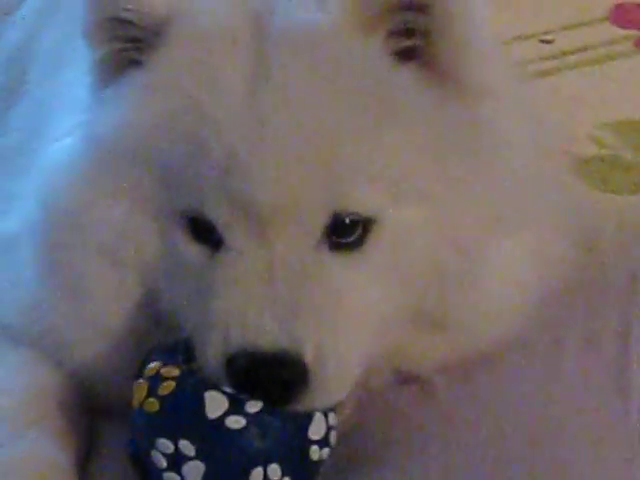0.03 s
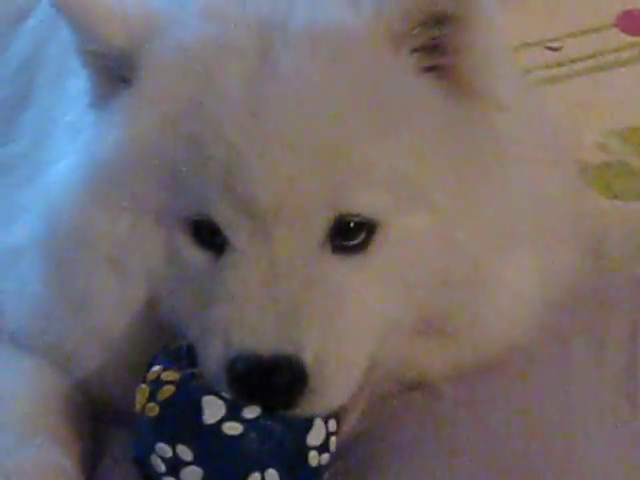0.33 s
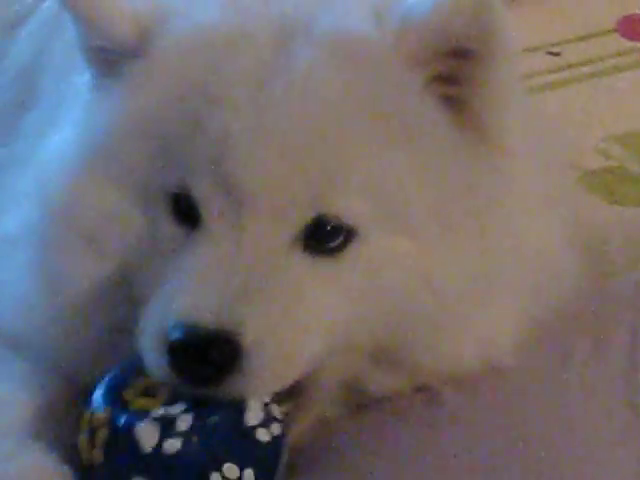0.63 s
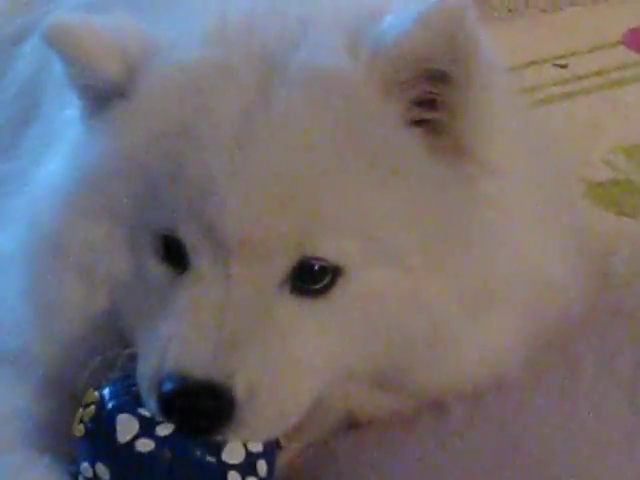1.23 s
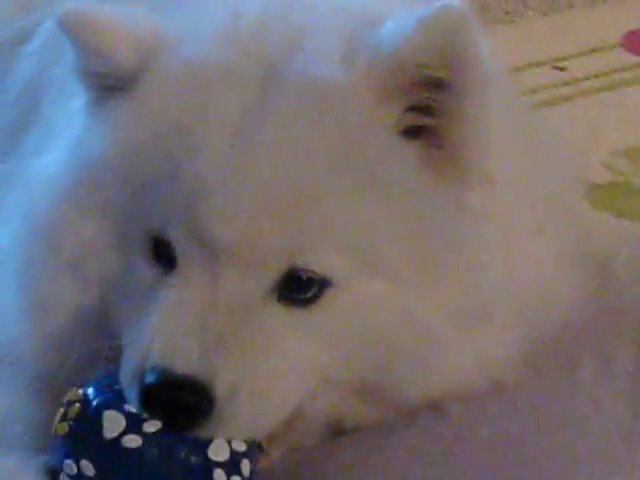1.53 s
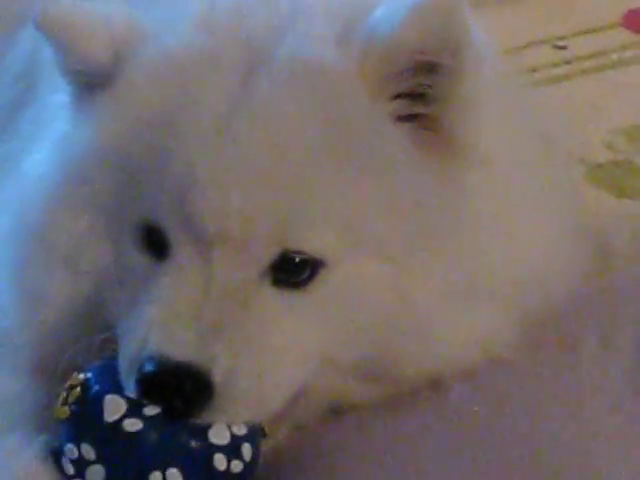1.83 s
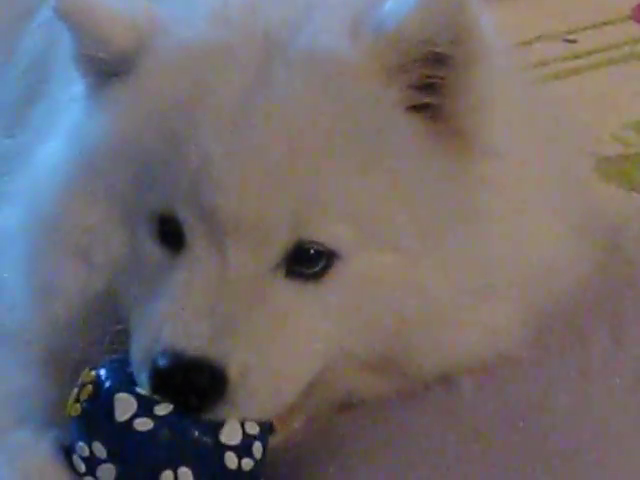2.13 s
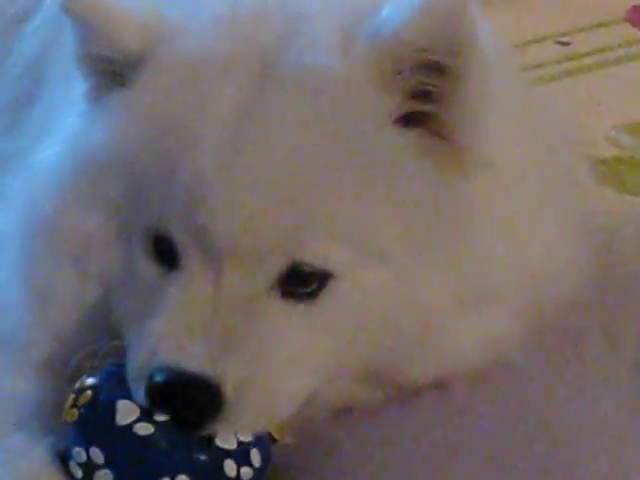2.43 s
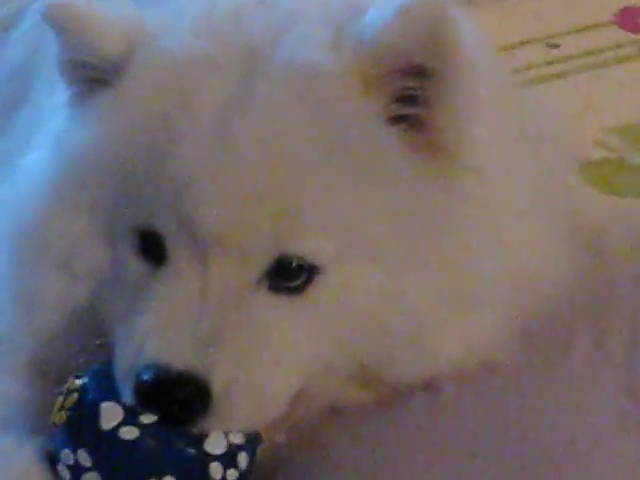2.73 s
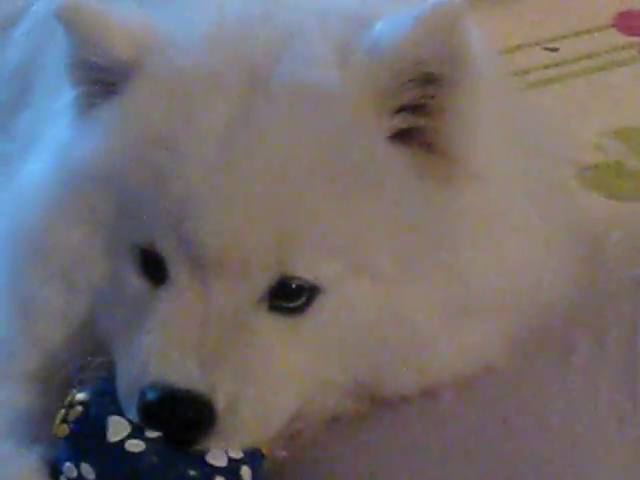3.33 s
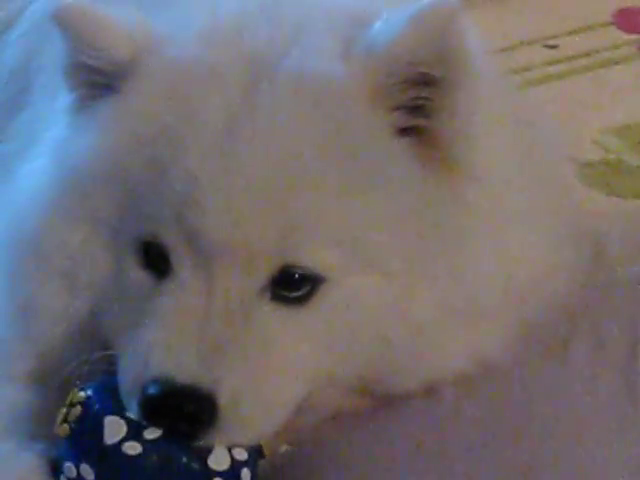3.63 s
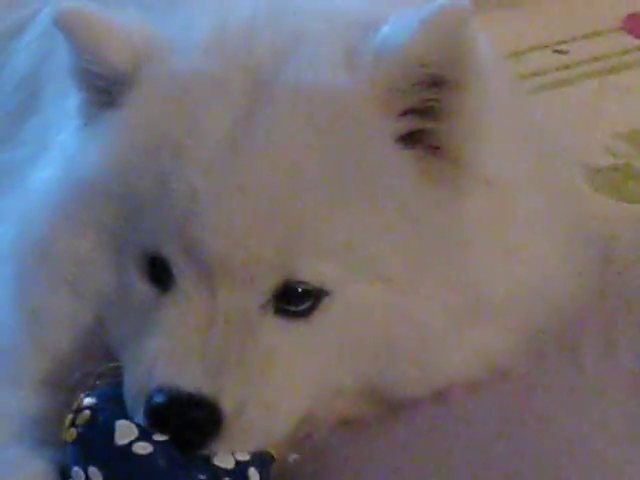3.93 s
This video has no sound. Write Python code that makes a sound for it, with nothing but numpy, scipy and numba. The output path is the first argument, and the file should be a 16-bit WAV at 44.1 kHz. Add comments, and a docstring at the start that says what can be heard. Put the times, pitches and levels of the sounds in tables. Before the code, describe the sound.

Close to the microphone in a quiet room, a squeaky toy is chewed by a dog in a steady rhythm. Six short, shrill squeaks alternate with five drawn-out, reedy tones that sag and sputter as the ball refills.

```python
"""A dog chews a rubber squeaker ball in a quiet room, close to a camera.
First a bite pushes air through the ball's reed: a loud squeak that rises and falls, with a soft, low
thump from the overloaded camera at its start. The gain control lets an instant through, then clamps.
Next the jaw eases and the ball sucks air back in: a long, lower tone that ends in flutter and hiss.
Near the end of that first refill the dog shifts its grip. Five more bites follow, with refills between."""
import sys
import numpy as np
from scipy import signal
from scipy.fft import rfft, irfft
from scipy.io import wavfile
from scipy.ndimage import uniform_filter1d
from numba import njit

SR = 44100
rng = np.random.default_rng(int(sys.argv[2]) if len(sys.argv) > 2 else 0)


def unload_audio(sound):
    """Save the sound as a 16-bit wav file, at the path given as the first command line argument."""
    columns = np.transpose(np.atleast_2d(sound))
    # keep every value between -1 and 1, then stretch to whole-number steps
    steps = np.round(np.clip(columns, -1, 1) * 32767)
    wavfile.write(sys.argv[1], SR, steps.astype(np.int16))


N = 176400
T = np.arange(N) / SR

# the tune of the squeak, one list per bite: (time [s], pitch [Hz])
BITE_PITCHES = [
    [(0.0, 1220), (0.032, 1361), (0.048, 1363), (0.066, 1623), (0.12, 1734), (0.13, 1832), (0.146, 1838),
     (0.16, 1745), (0.168, 1662), (0.18, 1266), (0.19, 1107)],
    [(0.856, 1139), (0.926, 1346), (0.936, 1454), (0.946, 1610), (0.98, 1843), (1.016, 1758), (1.04, 1789),
     (1.054, 1698), (1.06, 1660), (1.068, 1366), (1.085, 1105)],
    [(1.543, 1167), (1.603, 1395), (1.615, 1670), (1.633, 1740), (1.639, 1945), (1.643, 1906),
     (1.661, 1980), (1.683, 2050), (1.703, 2034), (1.721, 1880), (1.731, 1702), (1.735, 1646),
     (1.747, 1244), (1.75, 1167)],
    [(2.296, 1141), (2.322, 1210), (2.358, 1300), (2.382, 1350), (2.392, 1438), (2.404, 1612),
     (2.434, 1631), (2.454, 1679), (2.476, 1672), (2.49, 1602), (2.5, 1390), (2.516, 1242), (2.53, 1050)],
    [(3.16, 1158), (3.2, 1294), (3.241, 1380), (3.255, 1644), (3.273, 1674), (3.301, 1719), (3.316, 1690),
     (3.33, 1606), (3.34, 1362), (3.35, 1285), (3.365, 1080)],
    [(3.798, 1170), (3.816, 1243), (3.876, 1389), (3.886, 1606), (3.896, 1667), (3.912, 1660),
     (3.926, 1577), (3.928, 1569), (3.938, 1368), (3.96, 1283), (3.985, 1020)],
]
# one row per bite: (start [s], stop [s], strength [dB], pitch where the reed's period doubles [Hz])
BITE_EVENTS = [(-.02, 0.209, -5.5, 1730), (0.8558, 1.099, -6, 1720), (1.543, 1.772, -5, 1815),
               (2.2955, 2.539, -7, 1780), (3.1608, 3.378, -6, 1660), (3.798, 3.994, -5.5, 1780)]
# strength of the partials (the pure tones in a sound), blowing out: (frequency [Hz], relative level [dB])
BITE_COLOUR = [(1150, -22.5), (1700, -19.5), (2600, -15), (3400, -9.5), (4000, -9.5), (4900, -6),
               (5400, -0.5), (5950, 3), (6600, -2.5), (7300, -14), (8600, -24.5), (10000, -18.5),
               (11500, -23), (12400, -29), (13400, -23.5), (14700, -18.5), (15600, -20), (16000, -40)]
# on high notes the reed repeats only every second swing, which adds in-between partials:
# (pitch above the doubling point [Hz], relative level of those partials [dB])
DOUBLING = [(-150, -57), (-44, -34), (10, -13), (72, -10), (180, 1)]
# air rushing through the reed: (frequency [Hz], relative level [dB])
RUSH_COLOUR = [(60, -17), (300, -24), (900, -7), (2000, -11), (3500, -5), (6000, -5.5), (7200, 1.5),
               (9000, -7), (15500, -21)]
# the room's steady background noise: (frequency [Hz], relative level [dB])
BACKGROUND_COLOUR = [(25, -5.5), (70, 0), (150, -3), (240, -0.5), (400, -5), (800, -8), (2000, -23),
                     (15000, -12.5)]
# echoes from the floor and nearby furniture: (delay [s], level before dulling [dB])
ECHOES = [(.00855, -10.5), (.0133, -14.5), (.0181, -17), (.02, -16)]
# how long the room rings: (frequency [Hz], time to fade by 60 dB [s])
ROOM_FADE = [(500, .5), (3000, .48), (6000, .38), (9000, .24), (16000, .17)]
# how strongly the room rings: (frequency [Hz], level [dB])
ROOM_COLOUR = [(500, -6), (3000, -7.5), (6000, -6.5), (9000, -5), (16000, -7)]
# the tone of air going back in, one list per refill: (time [s], pitch [Hz], relative level [dB])
REFILL_CURVES = [
    [(.215, 988, -33), (.24, 1036, -29), (.275, 1056, -23), (.31, 1057, -23), (.425, 1047, -24.4),
     (.57, 1050, -21.6), (.623, 1045, -24.5), (.66, 1030, -25.5), (.69, 985, -27), (.715, 935, -27.5),
     (.745, 900, -30), (.78, 880, -37), (.81, 880, -42)],
    [(1.11, 995, -34), (1.147, 1041, -28.5), (1.18, 1049, -21.5), (1.257, 1043, -19.5), (1.29, 1035, -22.5),
     (1.41, 1029, -27), (1.45, 1016, -27.5), (1.468, 960, -29), (1.5, 915, -34), (1.53, 915, -38)],
    [(1.765, 1011, -31), (1.8, 1064, -27), (1.83, 1075, -23), (1.874, 1064, -21.4), (1.934, 1041, -26),
     (2.007, 1014, -24), (2.104, 971, -24.5), (2.148, 962, -24.7), (2.2, 962, -23), (2.235, 950, -26),
     (2.248, 915, -31), (2.265, 910, -36)],
    [(2.54, 1002, -31.5), (2.575, 1056, -23.5), (2.61, 1073, -20), (2.673, 1064, -14), (2.746, 1037, -20),
     (2.819, 1013, -14.5), (2.912, 965.5, -20.5), (2.996, 937.5, -18.5), (3.057, 932.3, -22),
     (3.108, 945, -21.5), (3.12, 928, -29), (3.136, 833, -31)],
    [(3.385, 992, -29), (3.41, 1036, -24), (3.43, 1061, -24.5), (3.465, 1062, -14.5), (3.515, 1052, -16),
     (3.551, 1038, -19.5), (3.596, 1017, -16.5), (3.69, 979.5, -18.5), (3.73, 967, -21.5),
     (3.752, 938, -24), (3.775, 872, -32)],
]
# one row per refill: (flutter starts [s], reed stops [s], ball is full [s], strength [dB], last hiss [dB])
REFILL_EVENTS = [(0.668, 0.795, 0.865, 4.5, -41), (1.418, 1.53, 1.555, 3, -35),
                 (2.21, 2.285, 2.305, 3.5, -34), (3.098, 3.145, 3.17, -0.5, -34),
                 (3.725, 3.785, 3.81, 1, -34)]
# strength of the partials, sucking in: (frequency [Hz], relative level [dB])
REFILL_COLOUR = [(930, -5.5), (1060, -5.5), (1880, -4), (2130, -4), (2830, -4), (3170, 2.5), (3750, -3),
                 (4080, -0.5), (4220, 2.5), (4700, -1), (5200, 0), (5350, 1.5), (5780, 4.5), (6000, -4),
                 (6200, -19), (6430, 5.5), (6650, 4), (7000, -7.5), (7400, -7), (8300, -7.5), (8750, -5.5),
                 (9100, -7.5), (9450, -4.5), (10000, -3.5), (10450, -20), (11000, -12), (11700, -5.5),
                 (12600, -6.5), (13600, -1.5), (14450, -2.5), (15000, -11), (15400, -11), (15700, -5.5)]
# faint steady hiss under the refill tone: (frequency [Hz], relative level [dB])
REFILL_HISS_COLOUR = [(300, -18), (1000, 3), (5000, 2), (10000, -8), (15000, -39)]
# the dog shifts its grip: (start [s], length [s], level [dB])
RUB_EVENTS = [(0.699, 0.082, -38), (0.773, 0.15, -44.5)]
# muzzle rubbing on rubber: (frequency [Hz], relative level [dB])
RUB_COLOUR = [(40, -14), (120, -22), (220, 1.5), (400, -19), (900, -11), (3000, -29), (12000, -8.5)]


def amp(db):
    """Turns decibels into a number to multiply by."""
    return 10 ** (np.asarray(db) / 20)


def unit(x):
    """Scales a signal to an average size (rms) of 1."""
    return x / np.sqrt(np.mean(x ** 2) + 1e-20)


def read(points, hz):
    """Reads between the rows of a table, giving each octave the same space."""
    frequencies, values = np.transpose(points)
    return np.interp(np.log(hz + 1), np.log(frequencies + 1), values)


def ramp(x):
    """A smooth step from 0 to 1."""
    return np.sin(np.pi / 2 * np.clip(x, 0, 1)) ** 2


def noise(colour):
    """Noise of size 1 whose balance of low and high follows a table."""
    gain = amp(read(colour, np.fft.rfftfreq(N, 1 / SR)))
    return unit(irfft(rfft(rng.standard_normal(N)) * gain, N))


def waver(length, step_s=0.016):
    """A curve that wanders from one random value to the next."""
    t = T[:length]
    knots = np.arange(0, t[-1] + step_s, step_s)
    return np.interp(t, knots, rng.standard_normal(len(knots)))


def reed(pitch, jitter, colour, doubling=None, thin_db=0, waver_db=0, jitter_hz=400, thin_hz=4000):
    """Air swings a small flap, a little unsteadily; the toy makes some partials louder than others."""
    smoothing = np.exp(-2 * np.pi * jitter_hz / SR)
    shake = unit(signal.lfilter([1], [1, -smoothing], rng.standard_normal(len(pitch))))
    phase = 2 * np.pi * np.cumsum(pitch * (1 + jitter * shake)) / SR
    hz = np.arange(SR)
    gain = amp(read(colour, hz)) * ramp((SR / 2 - hz) / 4000)
    out, power = 0, 0
    for multiple in np.arange(1, 18.5, 0.5):
        in_between = multiple % 1 != 0
        if in_between and doubling is None:
            continue
        size = gain[(pitch * multiple).astype(int)]
        if in_between:  # these grow by 2.5 dB per octave, up to the strength of the others
            size = size * np.minimum(doubling * amp(2.5 * np.log2(multiple / 2.5)), 1)
        power = power + size ** 2 / 2
        low_cut_db = thin_db / (1 + (pitch[0] * multiple / thin_hz) ** 2)
        size = size * amp(low_cut_db + waver_db * waver(len(pitch)))
        out = out + size * np.cos(multiple * phase + 2 * np.pi * rng.random())
    return out / np.sqrt(np.mean(power))


def bites(attack_s=0.000066, release_s=0.04, swell_db_per_octave=5.5, air_db=-33):
    """The reed snaps open; its pitch climbs as the jaw presses and falls as it eases."""
    out, rush = np.zeros(N), noise(RUSH_COLOUR)
    for curve, (start, stop, db, doubling_hz) in zip(BITE_PITCHES, BITE_EVENTS):
        on = (T >= start) & (T < stop)
        t = T[on]
        pitch = uniform_filter1d(np.interp(t, *np.transpose(curve)), size=130)
        fade = ramp((t - start) / attack_s) * ramp((stop - t) / release_s)
        level = fade * amp(db + swell_db_per_octave * np.log2(pitch / pitch[0]))
        doubling = amp(np.interp(pitch - doubling_hz, *np.transpose(DOUBLING)))
        tone = reed(pitch, jitter=0.0023, colour=BITE_COLOUR, doubling=doubling)
        out[on] += level * (tone + amp(air_db) * rush[on])
    return out


def thumps(thump_db=-21.5, thump_s=0.0014, rebound_db=-15.5, rebound_s=0.039):
    """The overloaded camera gives a short, low thump and a slow swing back as each squeak starts."""
    out = np.zeros(N)
    for start, stop, *_ in BITE_EVENTS:
        on = (T >= start) & (T < stop)
        age = T[on] - start
        pulse = age / thump_s * np.exp(1 - age / thump_s)
        rebound = amp(rebound_db) * ramp(age / (2 * thump_s)) * np.exp(-age / rebound_s)
        out[on] += pulse - rebound
    return amp(thump_db) * out


def echoes(x, cutoff_hz=4500):
    """Soft surfaces nearby send back a few late copies with less treble."""
    dull = signal.lfilter(*signal.butter(1, cutoff_hz, fs=SR), x)
    return sum(amp(db) * np.pad(dull, (round(delay * SR), 0))[:N] for delay, db in ECHOES)


def room(x):
    """Many reflections blur into one tail, whose high notes die away first."""
    reflections = rng.standard_normal(SR // 2) * ramp(T[:SR // 2] / 0.0017)
    hz, t, bands = signal.stft(reflections, SR, nperseg=256)
    fade_rate = np.log(1000) / read(ROOM_FADE, hz)[:, None]
    size = amp(read(ROOM_COLOUR, hz))[:, None] * np.sqrt(2 * fade_rate / SR)
    tail = signal.istft(bands * size * np.exp(-fade_rate * t), SR, nperseg=256)[1]
    return signal.fftconvolve(x, tail)[:N]


def refills(attack_s=0.0078, release_s=0.021, flutter_rise_s=0.06, steady_hiss_db=-37, rush_db=-20):
    """Air drawn back in holds a sagging tone; as the ball fills, it flutters and gives way to hiss."""
    out, rush, steady_hiss = np.zeros(N), noise(RUSH_COLOUR), noise(REFILL_HISS_COLOUR)
    for curve, (flutter_start, stop, full, db, last_hiss_db) in zip(REFILL_CURVES, REFILL_EVENTS):
        times, hz, level_db = np.transpose(curve)
        on = (T >= times[0]) & (T < full)
        t, age = T[on], T[on] - times[0]
        pitch = uniform_filter1d(np.interp(t, times, hz), size=500)
        flutter = ramp((t - flutter_start) / flutter_rise_s)
        thin_db = -3.5 * np.exp(-age / 0.1)  # the low partials reach full strength late
        tone = reed(pitch, jitter=0.0008 + 0.024 * flutter, colour=REFILL_COLOUR,
                    thin_db=thin_db, waver_db=2.1)
        suction_db = 9 * np.exp(-age / 0.13)  # the pull is strongest just after the jaw opens
        level = amp(db + np.interp(t, times, level_db) + suction_db) * ramp(age / attack_s)
        rush_level = flutter * np.hypot(level * amp(rush_db), amp(last_hiss_db))
        hiss = level * amp(steady_hiss_db) * steady_hiss[on] + rush_level * rush[on]
        out[on] += level * tone * ramp((stop - t) / release_s) + hiss * ramp((full - t) / release_s)
    return out


def rubs():
    """Muzzle and ball rub softly as the dog moves its head."""
    level = sum(amp(db) * np.sin(np.pi * np.clip((T - start) / length, 0, 1))
                for start, length, db in RUB_EVENTS)
    return level * noise(RUB_COLOUR)


def scene(refill_room_db=-2.5, background_db=-51):
    """The toy in a quiet room, the same in both ears; refills stir the room a little less than bites."""
    blown, sucked = bites(), refills()
    toy = blown + sucked
    ringing = room(blown + amp(refill_room_db) * sucked)
    mix = toy + thumps() + echoes(toy) + ringing + rubs() + amp(background_db) * noise(BACKGROUND_COLOUR)
    return np.array([mix, mix])


@njit
def gain_control(wanted_db, attack_s=0.0063, recover_db_per_s=89):
    """How many dB the camera turns the sound down: it clamps quickly and lets go at a steady rate."""
    out, cut_db = np.zeros(len(wanted_db)), wanted_db[:400].max()
    for i, wanted in enumerate(wanted_db):
        if wanted > cut_db:
            cut_db += (wanted - cut_db) / (attack_s * SR)
        else:
            cut_db = max(cut_db - recover_db_per_s / SR, wanted)
        out[i] = cut_db
    return out


def record(dry, limit_db=-25.5, ratio=4.6, ceiling_db=-3.5, notch_hz=7904, width_hz=460, top_hz=15900):
    """The camera turns loud sounds down, rounds off peaks, and drops a thin treble band and the very top."""
    level_db = 10 * np.log10(abs(uniform_filter1d(dry[0] ** 2, size=64)) + 1e-12)
    wanted_cut_db = np.maximum(level_db - limit_db, 0) * (1 - 1 / ratio)
    held = dry * amp(-gain_control(wanted_cut_db))
    rounded = held / (1 + (held / amp(ceiling_db)) ** 8) ** (1 / 8)
    hz = np.fft.rfftfreq(2 * N, 1 / SR)
    notch = 1 - np.exp(-((hz - notch_hz) / width_hz) ** 2)
    notched = irfft(rfft(rounded, 2 * N) * notch)[:, :N]
    low_pass = signal.firwin(511, top_hz, window=("kaiser", 9), fs=SR)
    return signal.oaconvolve(notched, low_pass[None], "same")


dry = scene()
out = record(dry)
unload_audio(out)
```